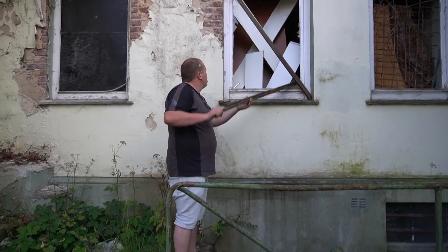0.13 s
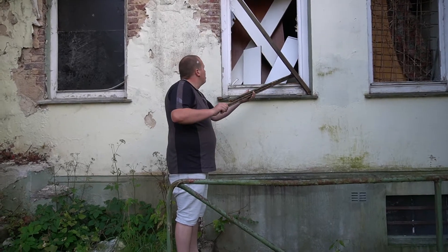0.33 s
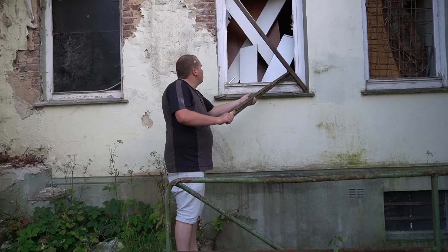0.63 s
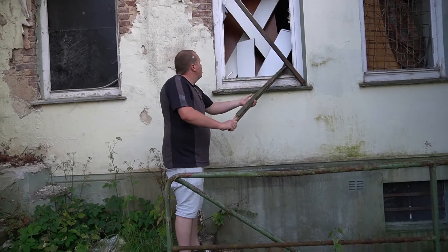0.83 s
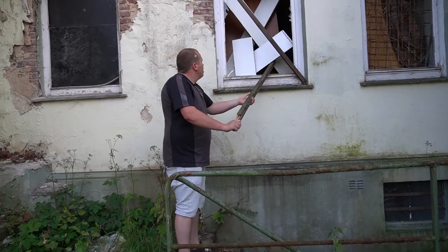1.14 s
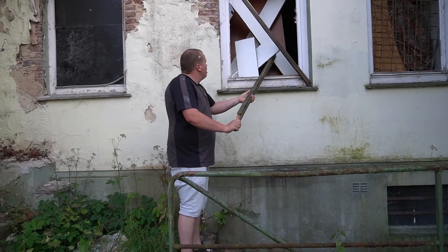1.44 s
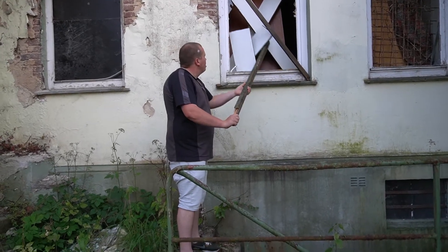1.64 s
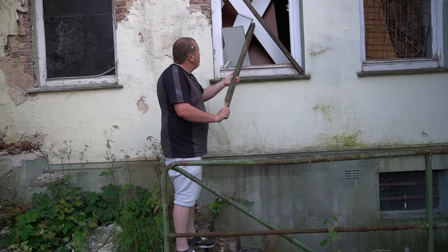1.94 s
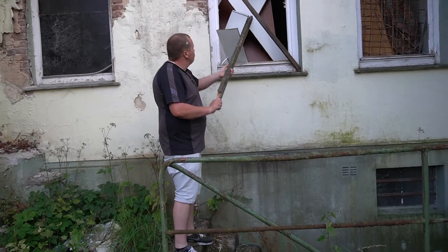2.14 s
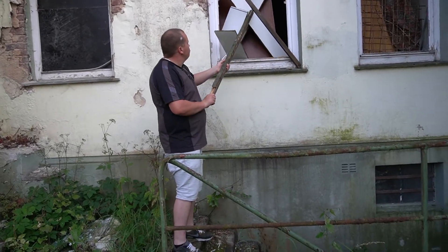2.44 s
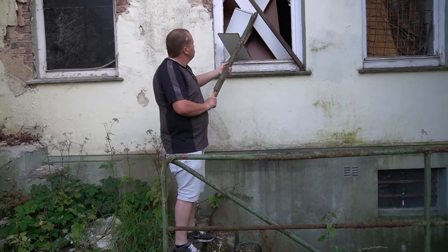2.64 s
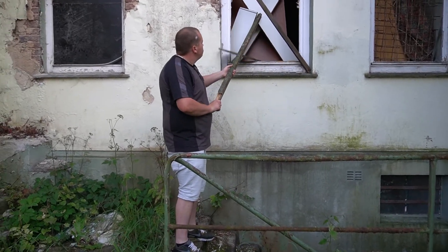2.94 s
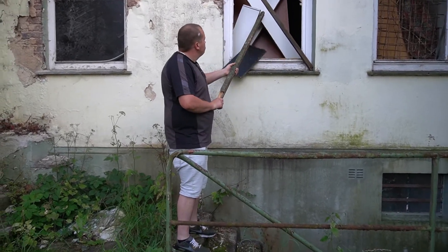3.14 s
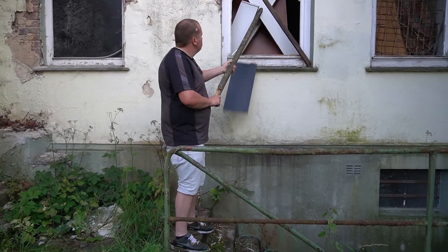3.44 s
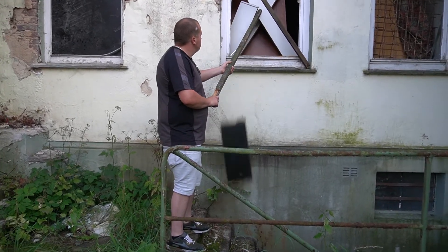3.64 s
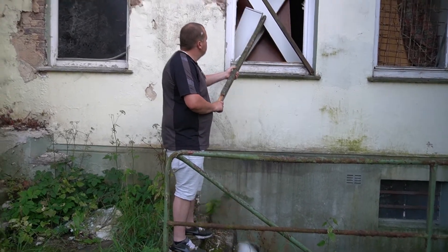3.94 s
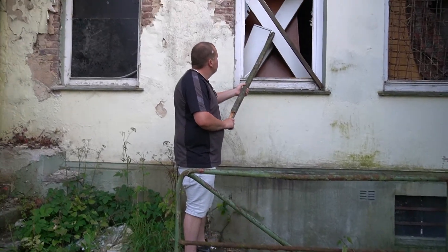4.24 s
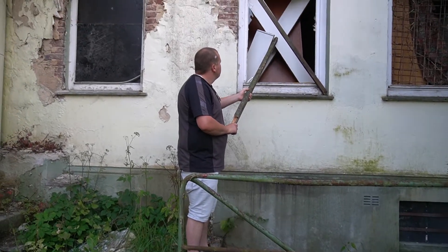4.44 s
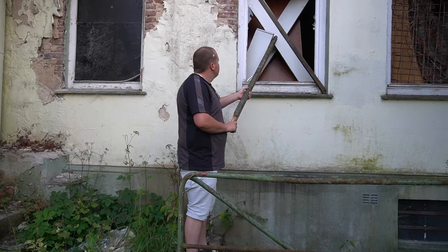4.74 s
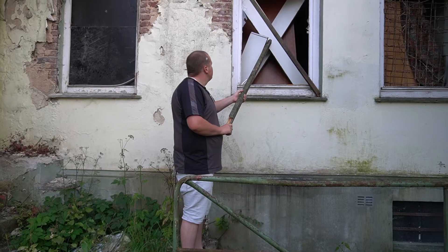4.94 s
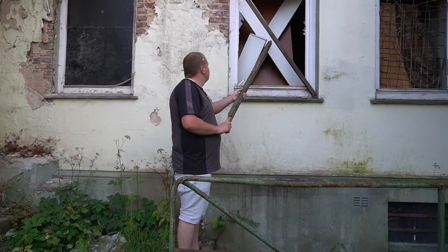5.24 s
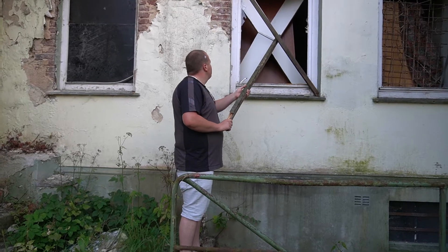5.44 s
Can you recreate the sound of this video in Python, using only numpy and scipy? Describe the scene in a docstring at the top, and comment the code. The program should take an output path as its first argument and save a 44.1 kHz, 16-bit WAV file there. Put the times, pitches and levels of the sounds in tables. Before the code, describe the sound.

Outdoors, a wooden pole knocks and scrapes boarded-up planks; a loose panel drops and clatters on the ground, then harder knocks follow.

```python
"""Far traffic hums under a faint hiss of leaves; then a wooden pole knocks and scrapes on a boarded-up window.
Blows are chattering bursts of noise filtered by the planks' resonances, with the echo of wall and empty room.
Scraping is a hail of stick-slip releases through the same planks; dry fibres snap as short bright cracks.
A loose panel slides down and bounces on the ground with resonances of its own; nails and hard edges ring
as clusters of decaying sines."""
import sys
import numpy as np
from scipy import signal
from scipy.fft import rfft, irfft, next_fast_len
from scipy.io import wavfile
from scipy.ndimage import uniform_filter1d, map_coordinates

SR = 44100
rng = np.random.default_rng(int(sys.argv[2]) if len(sys.argv) > 2 else 0)


def bounce(signal):
    """Save signal as a 16-bit WAV file at the path given by the first command-line argument."""
    frames = np.transpose(np.atleast_2d(signal))
    limited = np.clip(frames, -1, 1)
    pcm = np.round(limited * 32767).astype(np.int16)
    wavfile.write(sys.argv[1], SR, pcm)


N = 246078
RING = 24576  # longest ring of one blow, samples
WINDOW = round(.035 * SR)  # opening stretch over which a ring's level is set, samples

# Resonances of the planks in their frame. Each row: centre in Hz, width in Hz,
# height in dB relative to the dense modes around it.
PLANK_MODES = [(138.3, 1.6, 5), (204.6, 10.5, 18), (277, 31, 16.5), (343, 33, 9.5), (528.5, 120, 16.5),
               (581, 66, 5), (621.7, 13.5, 20.5), (692, 13.5, 15), (768, 19, 12), (843, 9.1, 12),
               (1190, 50, 5), (1260, 27, -6), (1650, 31, 2), (3080, 18, -1)]
# Borders between the thud, knock, clack and splinter registers, in Hz.
REGISTER_EDGES_HZ = [350, 1000, 3500]


def amp(db):
    """Level: decibels to linear gain."""
    return 10 ** (np.asarray(db) / 20)


def rms(x):
    """Effective value: root mean square."""
    return np.sqrt(np.mean(x ** 2) + 1e-20)


def along(points, hz):
    """Interpolation of (Hz, value) points on a logarithmic frequency axis."""
    f, v = np.transpose(points)
    return np.interp(np.log(hz + 1), np.log(f + 1), v)


def add(track, s, sound):
    """Superposition: mix a sound into the track at s seconds."""
    part = track[:, max(round(s * SR), 0):][:, :sound.shape[-1]]
    part += sound[..., :part.shape[-1]]


def wobble(rate):
    """Slow fluctuation: random knots, rate of them a second, joined by straight lines."""
    knots = rng.standard_normal(int(N * rate / SR) + 4)
    return map_coordinates(knots, [np.arange(N) * rate / SR], order=1)


def causal(gain):
    """Minimum phase: folding the cepstrum gives the causal response that has this gain."""
    cepstrum = irfft(np.log(np.maximum(gain, 1e-6)))
    half = cepstrum.shape[-1] // 2
    fold = np.r_[1, np.full(half - 1, 2), 1, np.zeros(half - 1)]
    return np.exp(rfft(cepstrum * fold))


def width_of(size):
    """Spatial coherence: long waves reach both channels alike, short ones do not."""
    # Each row: frequency in Hz, side level minus mid level in dB.
    spread = [(100, -56), (250, -21), (550, -13), (1000, -7.5), (2000, -5.5), (4000, -2), (8000, -1.5),
              (13000, -4.5)]
    return amp(along(spread, np.fft.rfftfreq(size, 1 / SR)))


def stereo(pair, width):
    """Mid and side: left and right spectra are sum and difference of two unrelated signals."""
    mid, side = rfft(pair)
    return np.array([mid + width * side, mid - width * side])


def outdoors(db):
    """Broadband ambience: noise shaped into a far traffic drone and a faint hiss of leaves."""
    # Each row: frequency in Hz, relative spectral density in dB.
    air_colour = [(24, -80), (40, -47), (220, -36), (412, -27.5), (444, -8.5), (479, -12), (542, -22.5),
                  (1340, -19.5), (1480, -17.5), (1590, -20), (2260, -30), (6650, -40), (10400, -37.5),
                  (16000, -44)]
    hz = np.fft.rfftfreq(N, 1 / SR)
    spectrum = stereo(rng.standard_normal((2, N)), width_of(size=N))
    air = irfft(spectrum * amp(along(air_colour, hz)), N)
    return amp(db + 0.24 * wobble(10.0)) * air / rms(air)


def pings():
    """Modal ringing: a nail or hard edge sounds a tight cluster of decaying sines."""
    # Each row: start in seconds, centre in Hz, width in Hz (two standard deviations of the cluster),
    # starting level in dB, decay by 60 dB in seconds.
    nails = [(1.376, 4350, 500, -21.5, 0.096), (1.384, 4680, 446, -19.5, 0.12),
             (2.713, 1657, 49.3, -26, 0.21), (3.04, 2020, 150, -28, 0.091), (3.048, 3510, 296, -31, 0.22),
             (3.775, 2100, 122.5, -37.5, 0.27), (4.688, 8000, 80, -42, .28), (5.282, 1357, 260, -14, 0.24)]
    out, t = np.zeros((2, N)), np.arange(RING) / SR
    for s, hz, width_hz, db, t60 in nails:
        cluster = hz + .5 * width_hz * rng.standard_normal((12, 1))
        phases = rng.random((2, 12, 1))
        ring = np.sin(2 * np.pi * (cluster * t + phases)).sum(1)
        add(out, s, amp(db - 60 * t / t60) * ring / rms(ring[:, :WINDOW]))
    return out


def registers(modes, size):
    """Modal resonance: a wooden body's response split into thud, knock, clack and splinter."""
    # The crowd of fine wood modes. Each row: frequency in Hz, relative gain in dB.
    fine_modes = [(30, -35.5), (75, -19.5), (130, -9), (250, -9), (700, 4.5), (950, 1.5), (1400, 3.5),
                  (2200, 3), (3500, -5), (6000, -9.5), (10000, -16.5), (13000, -20.5), (15800, -30.5)]
    hz = np.fft.rfftfreq(size, 1 / SR)
    peaks = sum(amp(db) ** 2 / (1 + (2 * (hz - centre) / width) ** 2) for centre, width, db in modes)
    # share of the power below each edge; neighbouring shares differ by one register
    below = [0 * hz] + [1 / (1 + (hz / edge) ** 12) for edge in REGISTER_EDGES_HZ] + [0 * hz + 1]
    shares = np.abs(np.diff(below, axis=0))
    return causal(amp(along(fine_modes, hz)) * np.sqrt((1 + peaks) * shares))


def grain_of_wood(size, depth_db, width_hz):
    """Modal excitation: a new spot picks its own set of modes, most markedly the high ones."""
    knots = rng.standard_normal(size)
    hz = np.fft.rfftfreq(size, 1 / SR)
    place = 4000 / width_hz * np.log1p(hz / 4000)  # knots lie farther apart towards the treble
    ripple = map_coordinates(knots, [place], order=1)
    return causal(amp(depth_db * np.minimum(hz / 2000, 1.2) * ripple))


def shifting(x, depth_db):
    """Moving contact: the rubbing point wanders, so resonances come and go."""
    z = signal.stft(x, nperseg=1024)[2]
    field = rng.standard_normal(z.shape[1:])
    field = uniform_filter1d(uniform_filter1d(field, size=4, axis=0), size=6, axis=1)
    return signal.istft(z * amp(depth_db * field / rms(field)), nperseg=1024)[1][:, :x.shape[-1]]


def rubbing():
    """Friction: a light touch mostly hisses, more force brings out the wood; gains of judder, rasp, grit."""
    # Strokes of the pole: the long prying, a dry scrape, a light brush.
    # Each row of a stroke: time in seconds, force in dB.
    pole_strokes = [
        [(0.75, -67), (0.85, -55), (0.91, -41.5), (1.04, -29.5), (1.12, -34.5), (1.19, -37.5), (1.24, -28),
         (1.46, -42.5), (1.58, -38.5), (1.72, -42), (1.85, -33), (1.97, -35), (2.07, -39.5), (2.13, -51.5)],
        [(2.12, -58.5), (2.18, -48.5), (2.31, -43.5), (2.37, -52), (2.43, -52)],
        [(2.54, -54), (2.66, -53.5), (2.75, -42.5), (2.9, -45), (3.04, -58)],
    ]
    # The panel sliding down, the panel settling, the pole's last push.
    # Each row of a stroke: time in seconds, force in dB.
    slides = [
        [(3.69, -56), (3.752, -52.5), (3.83, -49.5)],
        [(4.08, -47), (4.17, -44.5), (4.38, -54)],
        [(5.46, -24), (5.498, -25), (5.57, -24.5)],
    ]
    # The surface under each stroke, then each slide.
    # Each row: judder, rasp and grit in dB over the force, at the usual force.
    surfaces = [(-14, -1.5, -2), (-8, 1.5, 3), (-13.5, -2, -1.5), (-34, 0, 7), (-22, 0.5, -16.5),
                (-25, -9, -19)]
    # Growth of judder, rasp and grit, in dB per dB of force above the usual.
    growth = [1.24, 0.95, 0.76]
    usual_db = -45
    t, gains = np.arange(N) / SR, np.zeros((3, N))
    for stroke, surface_db in zip([*pole_strokes, *slides], surfaces):
        s, force_db = np.transpose(stroke)
        over_db = np.interp(t, s, force_db) - usual_db
        level_db = usual_db + np.array(surface_db)[:, None] + np.outer(growth, over_db)
        gains += amp(level_db) * (t > s[0]) * (t < s[-1])
    return gains


def scraping(spiky, snaps_per_s, snap_db):
    """Stick-slip: a hail of tiny releases on rough boards rings the planks, and dry fibres snap."""
    # Rubbing drives the wood more evenly than a blow does. Each row: frequency in Hz, gain in dB.
    rub_colour = [(60, 8), (110, 1), (170, -0.5), (290, -2), (500, -0.5), (850, -4.5), (1180, 2),
                  (2300, -1.5), (5500, 4), (11000, 7)]
    size = 2 * next_fast_len(N // 2 + RING)
    # releases hold for 20 samples each
    releases = np.repeat(np.minimum(rng.standard_normal(size // 20 + 1), 2.3), 20)[:size]
    slips = shifting(rng.standard_normal((2, size)) * np.exp(spiky * releases), depth_db=2.2)
    # sparse snaps, each a burst that dies within a few milliseconds
    starts = (rng.random(size) < snaps_per_s / SR) * rng.uniform(.3, 1, size)
    bursts = signal.lfilter([1], [1, -np.exp(-1 / (.002 * SR))], starts)
    snaps = bursts * rng.standard_normal((2, size))
    crackle = slips / rms(slips) + amp(snap_db) * snaps / rms(snaps)
    # direct sound plus a diffuse tail that falls 60 dB in 0.3 s
    tail = rng.standard_normal(RING) * amp(-60 * np.arange(RING) / SR / .3)
    echo = 1 + .5 * rfft(tail / np.linalg.norm(tail), size)
    path = echo * amp(along(rub_colour, np.fft.rfftfreq(size, 1 / SR)))
    thud, knock, clack, splinter = registers(PLANK_MODES, size=size)
    # judder, rasp and grit
    layers = [(slips, thud), (slips, knock + 2.4 * clack), (crackle, splinter)]
    pressure_db = 1.3 * wobble(60)
    out, width = np.zeros((2, N)), width_of(size=size)
    for (drive, body), level in zip(layers, rubbing()):
        sound = irfft(stereo(drive, width) * body * path)[:, :N]
        out += uniform_filter1d(level, size=600) * amp(pressure_db) * sound / rms(sound)
    return out


def blows(table, modes, note_db, note_t60, clack_db, clack_q, spiky, linger, modal_db, rise, strike):
    """Impact excitation: a short chatter of contacts rings the wood, then the building echoes."""
    # How thud, knock, clack and splinter die away. Each row: trim in dB, decay of the wood by 60 dB
    # in seconds, echo level in dB, decay of the echo by 60 dB in seconds before scaling by linger.
    fades = [(-9.5, 0.35, -2, 0.45), (-5.5, 0.36, -17, 0.26), (-3, 0.072, 2.5, 0.36), (-2, 0.2, -4.5, 0.43)]
    out, t = np.zeros((2, N)), np.arange(RING) / SR
    hz = np.fft.rfftfreq(RING, 1 / SR)
    octaves = np.log2(np.maximum(hz / REGISTER_EDGES_HZ[-1], 1))
    body, width = registers(modes, size=RING), width_of(size=RING)
    echoes = [amp(echo_db - 60 * t / (echo_t60 * linger)) for _, _, echo_db, echo_t60 in fades]
    falls = [amp(-60 * t / t60) for _, t60, _, _ in fades]
    early, note_fade = np.exp(-t / 0.01), amp(-60 * t / note_t60)
    for s, *levels_db, note_hz, clack_hz, chatter in table:
        # contacts and first reflections come in clumps, the late echo is smooth
        clumps = np.repeat(np.clip(rng.standard_normal(RING // 48), -2, 2), 48)
        contacts = rng.standard_normal((2, RING)) * np.exp(spiky * clumps * early)
        # a glancing blow chatters longer and builds up more slowly than a square one
        hold = int(np.clip(chatter, .001, .05) * SR)
        swell = 1 - np.exp(-t * SR / (rise * hold))
        # and the squarer it lands, the harder its first crack
        crack = strike * np.exp(-t / 0.0039) / np.sqrt(1 + (hold / SR / 0.0086) ** 2)
        # the stiffness of the contact lifts one broad band of the clack
        damping = 1j * hz * clack_hz / clack_q
        stiffness = 1 + amp(clack_db) * damping / (clack_hz ** 2 - hz ** 2 + damping)
        spot = grain_of_wood(RING, depth_db=modal_db, width_hz=60)
        # a blow that splinters more than it clacks is also brighter at the very top
        slope_db = 0.34 * np.clip(levels_db[3] - levels_db[2] + 11, -10, 10)
        colours = [1, 1, stiffness, amp(slope_db * octaves)]
        for k, db in enumerate(levels_db):
            wood = np.r_[np.ones(hold), falls[k][:RING - hold]]
            force = crack + swell * np.hypot(wood, echoes[k])
            ring = irfft(stereo(contacts * force, width) * body[k] * spot * colours[k])
            if k == 1:  # the struck wood's main bending note sits in the knock register
                note = swell * note_fade * np.sin(2 * np.pi * note_hz * t)
                ring += amp(note_db) * note * rms(ring.mean(0)[:WINDOW]) / rms(note[:WINDOW])
            add(out, s - .001, amp(db + fades[k][0]) * ring / rms(ring.mean(0)[:WINDOW]))
    return out


def struck(table):
    """Contact hardness: a hard blow trades knock for clack and splinter, a heavy one shakes the boarding."""
    # Knock, clack and splinter. Each row: dB over the blow's strength, dB gained per dB of hardness.
    blow_colour = [(-1, -0.37), (-5, 0.41), (-13, 1)]
    rows = []
    for s, db, hard_db, weight_db, *contact in table:
        upper_db = [db + trim_db + share * hard_db for trim_db, share in blow_colour]
        rows.append((s, db + weight_db, *upper_db, *contact))
    return rows


def fibre_snaps():
    """Brittle fracture: each dry fibre gives a short, bright crack that barely moves the plank."""
    # Each row: time in seconds, nominal level in dB, length of the tear in seconds.
    tears = [(0.507, -50.5, .005), (0.857, -44.5, 0.0072), (1.129, -30.5, 0.011), (1.515, -34.5, 0.0026),
             (1.569, -34, .01), (1.992, -41, 0.0094), (2.213, -37.5, 0.015), (2.367, -38, .003),
             (2.532, -52, .002), (2.613, -49, 0.0025), (3.038, -31, 0.016), (3.336, -45, 0.0061),
             (3.489, -45, 0.0098), (4.922, -34, 0.0013)]
    # Thud, knock, clack and splinter of every snap, in dB over its nominal level.
    colour_db = [-12, -9, -6, -1]
    note_hz, clack_hz = 560, 2100
    cracks = [(s, *(db + np.array(colour_db)), note_hz, clack_hz, tear) for s, db, tear in tears]
    return blows(cracks, PLANK_MODES, note_db=2, note_t60=0.48, clack_db=9, clack_q=12, spiky=0.33,
                 linger=0.92, modal_db=3.0, rise=0.1, strike=1.4)


def panel_bounces():
    """Repeated impact: the dropped panel rings in its own modes at each bounce on the ground."""
    # Each row: time in seconds, nominal strength in dB, hardness in dB, weight of the thud in dB,
    # note of the panel in Hz, centre of the clack in Hz, chatter in seconds.
    bounces = [(3.828, -18.5, 7.5, -24, 641, 1200, 0.009), (3.862, -19.5, 6, -4, 750, 1240, 0.0029),
               (3.934, -15.5, -2, -17, 738, 1650, .0055), (3.96, -15.5, -7, -44, 466, 1750, 0.018),
               (3.982, -22.5, -6, -14, 773, 2140, 0.0041), (4.002, -20, 1, -6, 510, 2070, 0.011),
               (4.183, -40.5, 1.5, -16, 750, 1670, 0.013)]
    # Each row: centre in Hz, width in Hz, height in dB relative to the dense modes around it.
    panel_modes = [(199, 84, 5), (257, 29, 6), (473, 4.5, 16.5), (537, 13, 12.5), (640, 23, 9),
                   (734, 4.6, 16), (880, 4.4, 5.5), (1490, 6.3, 4), (1600, 27, -1.5), (1860, 47, -3),
                   (2100, 45, 0), (2870, 46, -15)]
    return blows(struck(bounces), panel_modes, note_db=0, note_t60=0.24, clack_db=1.5, clack_q=6.0,
                 spiky=0.8, linger=1.12, modal_db=2.5, rise=0.11, strike=1.2)


def window_knocks():
    """Impact on a plate: pole and planks strike each other and the boarding rings in its modes."""
    # Each row: time in seconds, nominal strength in dB, hardness in dB, weight of the thud in dB,
    # note of the plank in Hz, centre of the clack in Hz, chatter in seconds.
    knocks = [(0.398, -37.5, -15, -6, 490, 1320, 0.0081), (0.411, -40, 1.5, 1, 528, 1720, 0.011),
              (1.031, -29.5, 5, 3, 575, 1250, 0.014), (1.208, -28.5, 4.5, -29, 593, 1310, 0.011),
              (1.326, -24, -6, -1.5, 604, 1490, 0.02), (1.342, -21.5, 5, 0.5, 601.5, 1230, 0.023),
              (1.357, -23, -21, -29, 592, 1200, 0.0053), (1.384, -31, 10.5, -23, 740, 1130, .0024),
              (1.604, -36.5, 7.5, 1, 632, 1245, 0.0083), (1.751, -31.5, 8.5, -28, 607, 2900, 0.035),
              (1.795, -22.5, 1.5, -13, 669, 1740, 0.0043), (1.915, -33, 0, -18, 485, 1220, 0.022),
              (2.018, -33.5, 3, 2.5, 478, 1230, 0.0085), (2.213, -34.5, -8, -30, 525, 1700, 0.026),
              (2.672, -22.5, -2, -45, 568, 1270, 0.049), (2.719, -24.5, 0, -19, 466, 1560, 0.0059),
              (2.779, -44, 14, -12, 452, 1690, 0.0037), (2.869, -35.5, 5.5, -40, 567, 3070, .008),
              (3.045, -27.5, -3, -12, 521.5, 3360, 0.018), (3.161, -21, -4, 0, 529, 1290, .013),
              (3.178, -27.5, 11.5, -4, 518, 1400, 0.013), (3.226, -29.5, -8, -12, 507, 1160, .003),
              (3.252, -18.5, -13.5, -8, 446, 2250, 0.0068), (3.359, -17.5, -10, -14, 533, 1320, 0.004),
              (3.396, -29.5, 10.5, 0.5, 598, 1370, 0.018), (3.413, -26, 0.5, 0.5, 654, 3080, 0.0032),
              (3.688, -42.5, 5, -40, 663, 1890, 0.015), (4.389, -34, 5, -21, 530, 1170, 0.017),
              (4.605, -15.5, -2.5, -13, 502.5, 1600, 0.0084), (4.62, -17, -3, -2, 541, 1620, 0.022),
              (4.685, -19, 3, 0.5, 695, 3320, 0.016), (4.843, -22, -1.5, -6, 492, 3380, .024),
              (4.995, -13.5, -3, -5, 655, 1720, 0.02), (5.035, -19.5, -8, -4, 560, 1520, 0.0059),
              (5.068, -16, -3, -5, 465, 1310, 0.022), (5.15, -38, 16, -14, 560, 1300, 0.019),
              (5.257, -20.5, -0.5, -8, 692, 2220, 0.016), (5.282, -14, -12, -13, 675, 1480, 0.013),
              (5.31, -16, -9, -32, 686, 1540, 0.014), (5.421, -21.5, -7.5, -9, 725, 1250, 0.01),
              (5.438, -26, -4, -10, 710, 1400, .008), (5.449, -15.5, 2.5, -22, 860, 2320, 0.016),
              (5.522, -24.5, 3.5, -21, 712, 2100, 0.0055), (5.539, -23.5, 5, -31, 870, 2760, 0.0061)]
    return blows(struck(knocks), PLANK_MODES, note_db=3.5, note_t60=0.2, clack_db=5.0, clack_q=8.2,
                 spiky=0.35, linger=0.9, modal_db=3.0, rise=0.18, strike=2.25)


def scene():
    """Superposition: knocks, snaps, the falling panel, scraping and pings over the outdoor hum."""
    wood = window_knocks() + fibre_snaps() + panel_bounces()
    rub = scraping(spiky=0.52, snaps_per_s=43, snap_db=-9)
    return wood + rub + pings() + outdoors(db=-55.0)


def record(dry):
    """Saturation and band limit: peaks are rounded off, the channels differ a little in colour."""
    # Each row: frequency in Hz, left level minus right level in dB.
    channel_lean = [(200, -0.5), (500, 0.5), (1000, -0.3), (2000, -1.5), (4000, 0), (8000, 2), (13000, 1.5)]
    top_hz = 15900  # nothing is kept above
    size = next_fast_len(N + RING)
    hz = np.fft.rfftfreq(size, 1 / SR)
    lean = amp(np.outer([.5, -.5], along(channel_lean, hz)))
    rounded = dry / (1 + (dry / .68) ** 6) ** (1 / 6)
    return irfft(rfft(rounded, size) * lean * (hz < top_hz), size)[:, :N]


dry = scene()
out = record(dry)
bounce(out)
```